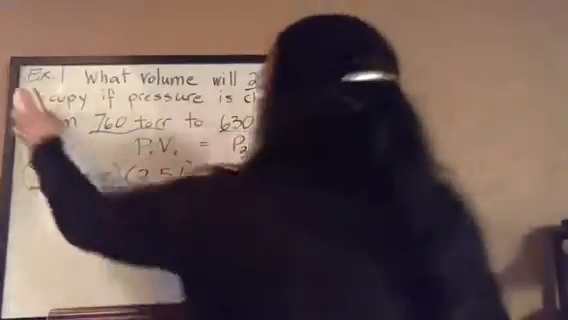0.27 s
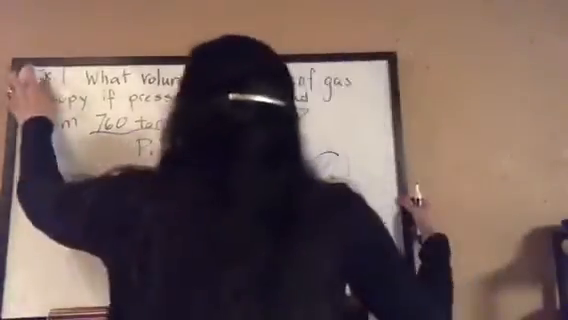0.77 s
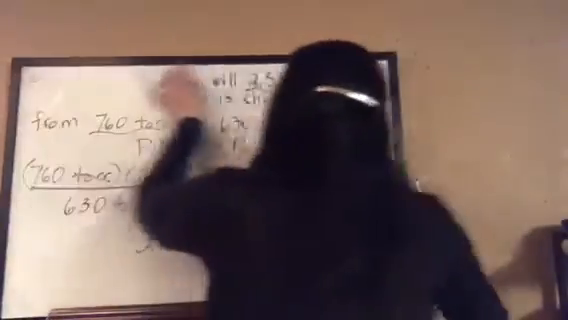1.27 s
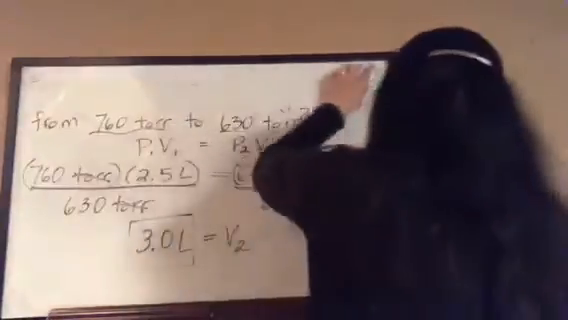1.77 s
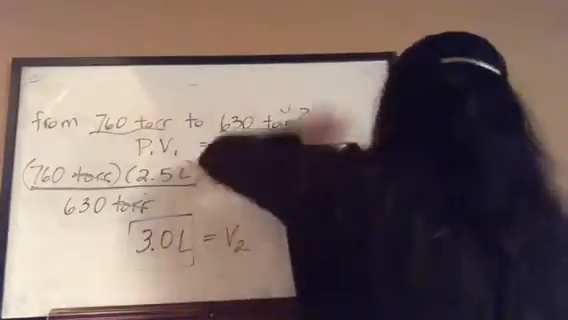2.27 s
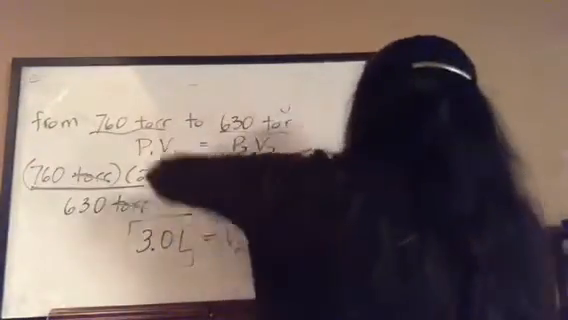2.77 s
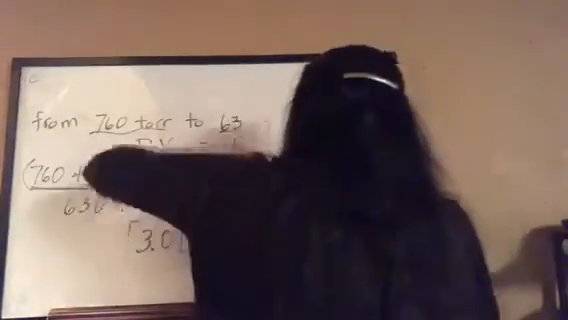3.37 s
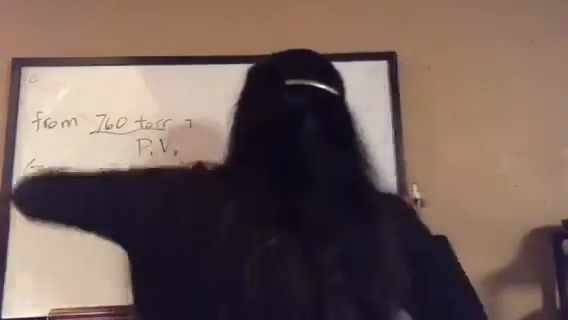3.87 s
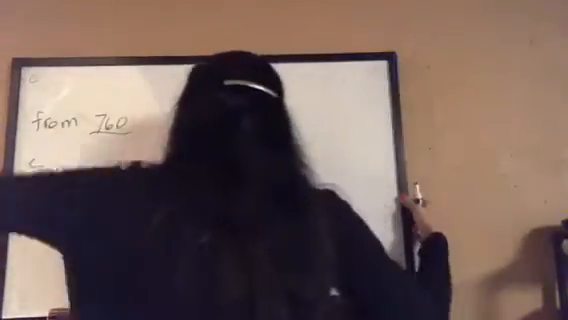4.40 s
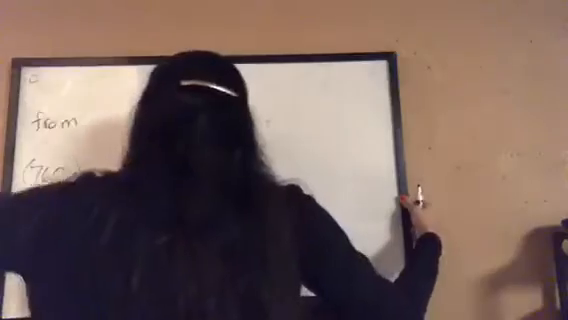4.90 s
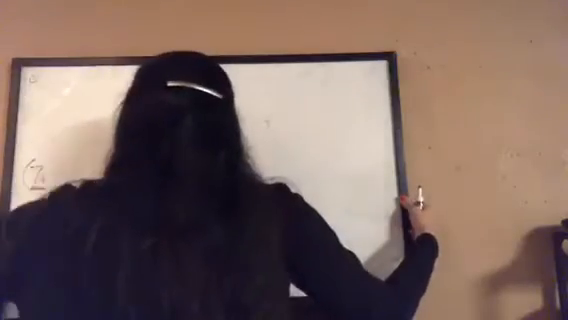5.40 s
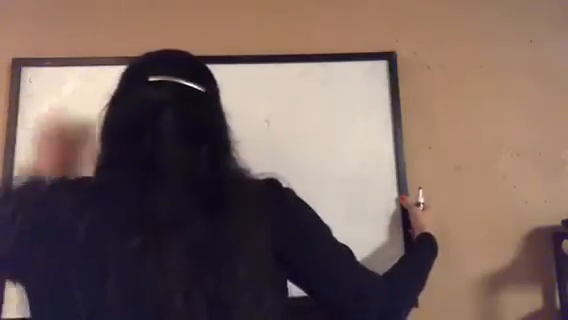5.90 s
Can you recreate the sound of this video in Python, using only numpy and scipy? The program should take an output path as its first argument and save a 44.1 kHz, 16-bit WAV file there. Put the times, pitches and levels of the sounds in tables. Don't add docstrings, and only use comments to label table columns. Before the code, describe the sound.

In a small room with faint low rumble, a felt eraser wipes a loose whiteboard a few steps from the microphone. Soft uneven hisses begin at once; around 0.5 to 0.65 seconds light knocks bunch into a quick rattle with a short hollow ring. Pressure eases, then a longer drag from 0.9 swells into a low, stick-slip groan that lets go at 1.3, with a tiny squeak and scrape. A short dull grunt and knock follow at 1.5. The loudest sharp clack lands at 2.4, ringing behind the panel, and wiping becomes regular, about four strokes a second, slowly softening. A soft bump comes at 2.6, hard knocks at 3.0 and 3.5, and another very loud, bright crack at 4.6. Faint squeaks come just before it. A longer light stroke starts near 5.1; three quick taps grow from 5.55 to 5.8, then ringing and soft rubbing fade.

```python
import sys
import numpy as np
from scipy import signal
from scipy.io import wavfile

SR = 44100
rng = np.random.default_rng(int(sys.argv[2]) if len(sys.argv) > 2 else 0)


def how_loud(loudness_db):
    steps = np.asarray(loudness_db, float) / 20
    return 10 ** steps


def store_wav(level_fs):
    pcm = np.round(np.clip(np.atleast_2d(level_fs), -1, 1) * 32767)
    wavfile.write(sys.argv[1], SR, pcm.T.astype(np.int16))


N = 271082


def rms_one(x):
    return x / np.sqrt(np.mean(x ** 2) + 1e-20)


def at_hz(points, hz):
    table_hz, value = np.array(points)[:, 0], np.array(points)[:, 1]
    return np.interp(np.log(hz), np.log(table_hz), value)


def drift(rate):
    r = np.exp(-80 * np.pi * rate / SR)
    white = rng.standard_normal(N // 40 + 2002)
    slow = signal.lfilter([1], [1, -2 * r, r * r], white)[2000:]
    return np.interp(np.arange(N) / 40, np.arange(len(slow)), rms_one(slow))


def band(x, low_hz, high_hz, order=2):
    edges = [low_hz, min(high_hz, .45 * SR)]
    return signal.sosfilt(signal.butter(order, edges, "band", fs=SR, output="sos"), x)


def resonance(x, hz, width):
    r = np.exp(-np.pi * width / SR)
    poles = [1, -2 * r * np.cos(2 * np.pi * hz / SR), r * r]
    return signal.lfilter(np.array([1, 0, -1]) * (1 - r * r) / 2, poles, x)


def patchy_noise(spectrum, patchy_db, rate, count):
    edges = np.geomspace(spectrum[0][0], spectrum[-1][0], count + 1)
    white = rng.standard_normal((2, N))
    total = 0
    for k, (low, high) in enumerate(zip(edges, edges[1:])):
        level_db = at_hz(spectrum, np.sqrt(low * high)) + patchy_db * drift(rate)
        total = total + how_loud(level_db) * band(white[k % 2], low, high)
    return rms_one(total)


# turn in seconds, pressure until the next turn in dB.
REACHES = [
    (.08, -9.5),
    (.28, -3),
    (.43, -2),
    (.7, -40),
    (.86, -6),
    (1.77, -3),
    (2.13, -0.2),
]
LAST_STROKE_S = [
    5.1,
    6.19,
]
SWING_FROM_S, SWING_S, SWINGS = 2.472, .268, 12
TIRING_DB_PER_S, STROKE_LEAN = -0.75, .15


def hand():
    turns, pressure_db = np.transpose(REACHES)
    swings = np.r_[SWING_FROM_S + SWING_S * np.arange(SWINGS), LAST_STROKE_S]
    turns = np.r_[turns, swings]
    pressure_db = np.r_[pressure_db, TIRING_DB_PER_S * (swings - SWING_FROM_S)]
    progress = np.interp(np.arange(N) / SR, turns, np.arange(len(turns)))
    lean = STROKE_LEAN * np.sin(np.pi * progress) ** 2
    speed = np.abs(np.sin(np.pi * progress - lean))
    return speed, pressure_db[progress.astype(int)]


# frequency in Hz, density in dB per Hz.
RUMBLE = [(15, -71.5), (25, -33), (64, -7.5), (92, -3.5), (108, 0), (135, -11), (170, 3.5), (220, -36),
          (370, -120)]


def room_rumble():
    return how_loud(-72) * patchy_noise(RUMBLE, patchy_db=1.5, rate=5.7, count=5)


# frequency in Hz, density in dB per Hz.
RUB = [(100, -31), (170, -13), (233, -7), (302, -0.5), (382, -8), (500, -3.5), (535, -6), (812, -8),
       (994, -8), (1330, -10.5), (2500, -20.5), (3250, -46), (5500, -120)]
RUB_DB, REST_RUB_DB = -65, -72
RUB_FOLLOWS, RUB_SPEED_POWER = 0.44, 0.19


def rubbing_through_panel():
    speed, pressure_db = hand()
    moving = speed ** RUB_SPEED_POWER * how_loud(RUB_DB + RUB_FOLLOWS * pressure_db)
    level = np.hypot(how_loud(REST_RUB_DB), moving)
    return level * patchy_noise(RUB, patchy_db=3.5, rate=11, count=14)


# start in seconds, level in dB, pitch in Hz, swell in seconds.
BUMPS = [
    (0.618, -57, 108.4, 0.037),
    (2.139, -55.5, 47.3, 0.026),
    (2.632, -50.5, 117.2, 0.023),
    (3.019, -59, 106, 0.036),
    (3.12, -60, 56.3, 0.021),
    (3.55, -60, 77.2, 0.055),
    (4.279, -59.5, 104, 0.021),
    (4.6, -60.5, 63, 0.032),
    (5.581, -69, 113, 0.024),
    (5.8, -60, 108.4, 0.037),
]


def bumps():
    out, t = np.zeros(N + SR), np.arange(SR // 2) / SR
    for s, db, hz, swell_s in BUMPS:
        swell = t / swell_s * np.exp(1 - t / swell_s)
        out[round(s * SR):][:len(t)] += how_loud(db) * swell * np.sin(2 * np.pi * hz * t)
    return out[:N]


# start in seconds, level in dB, pitch in Hz.
SQUEAKS = [
    (0.393, -59, 1490),
    (0.437, -63, 1510),
    (0.914, -66, 1270),
    (0.996, -57.5, 1310),
    (2.186, -65, 1480),
    (2.282, -65, 1450),
    (3.41, -68, 1220),
    (4.343, -60, 1340),
    (4.477, -61, 1350),
]


def squeaks():
    out, waver = np.zeros(N + SR), rng.standard_normal(N)
    swell = np.hanning(int(.043 * SR))
    for s, db, hz in SQUEAKS:
        start = round(s * SR)
        once = resonance(waver[start:][:len(swell)], hz, 110)
        tone = rms_one(resonance(once, hz, 110))
        out[start:][:len(swell)] += how_loud(db - 4.0) * swell * tone
    return out[:N]


# start in seconds, level in dB.
TICKS = [
    (.476, -51),
    (0.578, -59),
    (.643, -71),
    (2.382, -48),
    (2.44, -61),
    (3.521, -57),
    (4.576, -32.5),
    (5.787, -49),
]
TICK_T60_S, TICK_LOW_HZ = 0.04, 5000


def ticks():
    out, t = np.zeros(N), np.arange(SR // 20) / SR
    for grit, (s, db) in zip(rng.standard_normal((len(TICKS), len(t))), TICKS):
        out[round(s * SR):][:len(t)] += how_loud(db - 60 * t / TICK_T60_S) * grit
    return band(out + 1e-18, TICK_LOW_HZ, 17000)


SCRAPE_S, SCRAPE_LIFT_S = 1.22, 1.28
SCRAPE_DB, SCRAPE_HOLD_DB = -56.5, -74
SCRAPE_RISE_DB_PER_S, SCRAPE_FALL_DB_PER_S = 450, 250


def scrape():
    late = np.arange(N) / SR - SCRAPE_S
    before_db = SCRAPE_DB + SCRAPE_RISE_DB_PER_S * late
    after_db = np.maximum(SCRAPE_DB - SCRAPE_FALL_DB_PER_S * late, SCRAPE_HOLD_DB)
    level = how_loud(np.where(late < 0, before_db, after_db))
    grit = rng.standard_normal(N) * how_loud(3.4 * drift(60))
    lifting = np.clip((SCRAPE_LIFT_S - SCRAPE_S - late) / .05, 0, 1)
    return lifting * level * rms_one(band(grit, 1300, 10000, order=1))


# start in seconds, level in dB, pitch in Hz, t60 in seconds.
RINGS = [(.58, -34.5, 500, 0.38), (2.385, -26.5, 480, 0.38), (2.987, -35.5, 525, 0.46),
         (3.523, -27, 526, 0.37), (4.578, -23, 510, 0.46), (5.564, -48, 436, 0.48), (5.675, -41, 498, 0.46),
         (5.788, -38.5, 542, 0.35), (5.788, -41.5, 1068, 0.38), (4.577, -22, 1000, 0.079),
         (.643, -33, 1035, 0.082), (5.789, -29, 1145, 0.072)]


def gap_rings(fill_share=0.052, width=52):
    out, t = np.zeros(N + SR), np.arange(SR // 2) / SR
    for noise, (s, db, hz, t60) in zip(rng.standard_normal((len(RINGS), SR)), RINGS):
        once = resonance(noise, hz, width)
        cluster = rms_one(resonance(once, hz, 1.92 * width)[len(t):])
        fill = 1 - np.exp(-t / (fill_share * t60))
        out[round(s * SR):][:len(t)] += how_loud(db - 60 * t / t60) * fill * cluster
    return out[:N]


RING_FROM_THUD, RING_FROM_RAP = 0.28, 0.27


def colour(hz, knock):
    s, peak_db, thud_db, rap_db, crack_db = knock
    ring_db = RING_FROM_THUD * thud_db + RING_FROM_RAP * rap_db
    regions = [(330, thud_db), (360, 0), (460, 0), (490, ring_db), (700, ring_db),
               (750, rap_db), (1300, rap_db), (3300, crack_db)]
    return peak_db + at_hz(regions, hz)


# frequency in Hz, level in dB, t60 in seconds.
PANEL = [(118.5, -12.5, 0.32), (213, -8, 0.073), (262.7, 2, 0.19), (336.5, -6, 0.0824),
         (366.3, -3.5, 0.076), (399, 0.5, 0.083), (454.5, -5.5, 0.062), (508.4, 1.5, 0.07), (541, -9, 0.25),
         (603, 0.5, 0.085), (698, -10.5, 0.024), (748.6, 1, 0.038), (912.4, -1, 0.037),
         (1020, -13.5, 0.033), (1199, -17.5, 0.034)]


def low_modes(t, swell_s=0.002, late_cycles=1.6, spread_db=3.5):
    hz, level_db, t60 = np.array(PANEL).T[:, :, None]
    chance, rows = rng.standard_normal((len(KNOCKS), 3, len(PANEL), 1)), []
    rise = 1 - np.exp(-t / (swell_s + late_cycles / hz))
    for (spread, phase, grip), knock in zip(chance, KNOCKS):
        mode_db = level_db + colour(hz, knock) + spread_db * spread
        modes = how_loud(mode_db - 60 * t / t60) * rise
        held_hz = hz * (1 + 0.019 * grip)
        hit = np.sum(modes * np.sin(2 * np.pi * held_hz * t + 0.75 * phase), axis=0)
        rows.append(how_loud(knock[1] - 2.0) * hit / np.max(np.abs(band(hit, 332, 536))))
    return np.array(rows)


# frequency in Hz, level in dB.
RAP = [(200, -8.5), (404, -13), (684, -6), (1314, -7.5), (2090, -0.17), (6300, 0.4), (9000, -15),
       (13250, -20)]
# frequency in Hz, t60 in seconds.
ROOM_T60 = [(100, 0.78), (250, 0.6), (500, 0.57), (1200, 0.4), (3000, 0.38), (7000, 0.32), (12000, 0.29)]
RAP_RISE_CYCLES, CRACK_T60_S, BODY_T60_S, BODY_TOP_HZ = 3.2, 0.0097, 0.12, 850
TAIL_DB, TAIL_KNEE_HZ, TAIL_DB_PER_OCTAVE = -8.5, 420, -3.5


def raps(t, fill_s=0.0007, count=13):
    grit, out = rng.standard_normal((len(KNOCKS), 2, len(t))), 0
    for k, hz in enumerate(np.geomspace(RAP[0][0], RAP[-1][0], count)):
        t60 = CRACK_T60_S + BODY_T60_S / (1 + (hz / BODY_TOP_HZ) ** 2)
        tail_db = TAIL_DB + TAIL_DB_PER_OCTAVE * max(np.log2(hz / TAIL_KNEE_HZ), 0)
        tail = (1 - np.exp(-t / fill_s)) * how_loud(tail_db - 60 * t / at_hz(ROOM_T60, hz))
        rise = 1 - np.exp(-t * hz / RAP_RISE_CYCLES)
        shape = rise * np.hypot(how_loud(-60 * t / t60), tail)
        puffs = shape * band(grit[:, k % 2], hz / 1.267, hz * 1.216)
        puffs = puffs * np.sqrt(np.sum(shape ** 2) / np.sum(puffs ** 2, axis=1, keepdims=True))
        level_db = [[at_hz(RAP, hz) + colour(hz, knock)] for knock in KNOCKS]
        out = out + how_loud(level_db) * puffs
    return out


# start in seconds, peak in dB, then relative to it in dB
# the thud under 320 Hz, the 1 kHz rap and the crack.
KNOCKS = [(0.467, -52.5, 11, 6, -12), (0.477, -44.5, 4, 3, -2.5), (0.541, -34, 2.5, 7, -10.5),
          (0.552, -27, -13, -2.5, -15), (0.5794, -23.5, -21, -3.5, -14.5), (0.643, -30.5, -13, 4.5, -19.5),
          (1.509, -39.5, -10, -12, -15), (1.76, -58.5, 3, -21, -29), (2.383, -10.5, -23.5, -4, -14.5),
          (2.629, -40.5, -5, -43, -33), (2.986, -18, -18.5, -6, -20.5), (3.52, -19.5, -8, 5.5, -15),
          (3.702, -53, -18, 6.5, 1.5), (4.092, -59.5, -1.5, -16, -2.5), (4.577, -12, -22.5, 0.6, -10),
          (5.144, -52.5, -6, -4.5, -10), (5.562, -30.5, -13, -2.5, -23), (5.675, -32, -14.5, -1.5, -16),
          (5.787, -23, -21, -1, -17)]


def knocks():
    t = np.arange(int(.45 * SR)) / SR
    out = np.zeros(N + SR)
    for row, knock in zip(low_modes(t) + raps(t), KNOCKS):
        out[round((knock[0] - .001) * SR):][:len(row)] += row
    return band(out[:N], 67, 18000)


# frequency in Hz, width in Hz, level in dB.
GROAN_BODY = [(196, 28, -7.5), (262, 52, 1), (349.5, 54.4, 9), (398, 47.5, 6.5), (579, 63, -1.5),
              (813, 51, -3.5), (1000, 62, -9.5), (1400, 480, -18), (2220, 1140, -25.5)]
# start in seconds, let-go in seconds, peak in dB, brightness in dB.
DRAGS = [
    (0.964, 1.318, -41, -5.5),
    (1.498, 1.519, -38.5, -13.5),
    (1.552, 1.585, -50, -13),
]
DRAG_ATTACK_S, DRAG_SWELL_DB_PER_S, DRAG_RELEASE_DB_PER_S = 0.047, 37, 240
DRAG_TAIL_DB, DRAG_TAIL_DB_PER_S = -11.5, 140


def groan(slips_per_s=3500, uneven_db=1.5):
    t, out = np.arange(N) / SR, 0
    size = how_loud(uneven_db * rng.exponential(1, N))
    slips = size * rng.choice([-1, 1], N) * (rng.random(N) < slips_per_s / SR)
    modes = [how_loud(db) * (-1) ** k * resonance(slips + 1e-18, hz, width)
             for k, (hz, width, db) in enumerate(GROAN_BODY)]
    low, high = rms_one(sum(modes[:4])), rms_one(sum(modes[4:]))
    for start, end, peak_db, bright_db in DRAGS:
        swell_db = DRAG_SWELL_DB_PER_S * (t - end)
        release_db = DRAG_RELEASE_DB_PER_S * (end - t)
        tail_db = DRAG_TAIL_DB + DRAG_TAIL_DB_PER_S * (end - t)
        drag_db = peak_db + np.minimum(swell_db, np.maximum(release_db, tail_db))
        attack = np.clip((t - start) / DRAG_ATTACK_S, 0, 1)
        out = out + attack * how_loud(drag_db) * (low + how_loud(bright_db) * high)
    return out


# frequency in Hz, density in dB per Hz.
FELT = [(1000, -39), (1700, -9), (2470, -5), (3650, -2), (4970, -3), (6020, -2.5), (7730, -3.5), (8200, -2),
        (10700, -40), (18000, -120)]
# frequency in Hz, density in dB per Hz.
FELT_TOP = [(4650, -38.5), (7900, -20), (8380, -4.5), (11600, -3), (15200, -8.5), (15900, -13)]
HISS_DB, TOP_DB, TOP_FOLLOWS = -63.5, -71, 1
REST_DB, REST_TOP_DB = -75, -81
GRIP_S, EARLY_DULL_DB = 1, -4


def felt():
    speed, pressure_db = hand()
    dull_db = EARLY_DULL_DB * (np.arange(N) / SR < GRIP_S)
    flow = speed ** .75
    hiss = np.hypot(how_loud(REST_DB), flow * how_loud(HISS_DB + pressure_db))
    moving_top = flow * how_loud(TOP_DB + TOP_FOLLOWS * pressure_db + dull_db)
    top = np.hypot(how_loud(REST_TOP_DB + dull_db / 2), moving_top)
    fibres = patchy_noise(FELT, patchy_db=1.5, rate=14, count=14)
    fibres = signal.sosfilt(signal.butter(12, 7950, fs=SR, output="sos"), fibres)
    return hiss * fibres + top * patchy_noise(FELT_TOP, patchy_db=1.1, rate=14, count=4)


def scene():
    board = knocks() + gap_rings() + bumps() + groan()
    eraser = felt() + scrape() + squeaks()
    background = room_rumble() + rubbing_through_panel()
    return (board + eraser + background + ticks())[None]


def roll_off(x):
    return signal.sosfilt(signal.butter(12, 16480, fs=SR, output="sos"), x)


MIC_TOP_HZ = 15850


def record(dry):
    heard = signal.sosfilt(signal.butter(2, 28, "high", fs=SR, output="sos"), dry)
    heard = signal.sosfilt(signal.cheby2(14, 45, MIC_TOP_HZ + 250, fs=SR, output="sos"), heard)
    return roll_off(heard)


dry = scene()
out = record(dry)
store_wav(out)
```